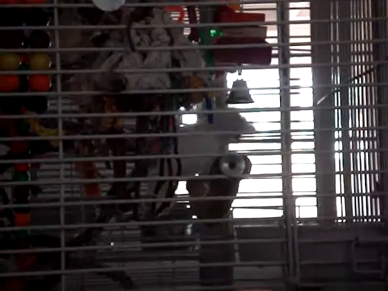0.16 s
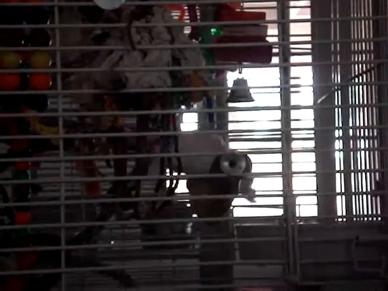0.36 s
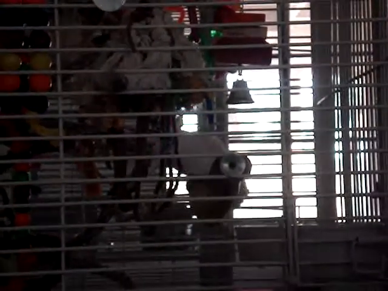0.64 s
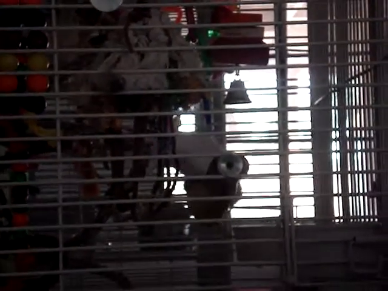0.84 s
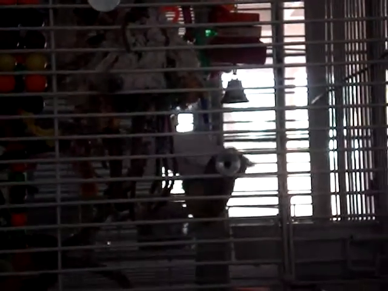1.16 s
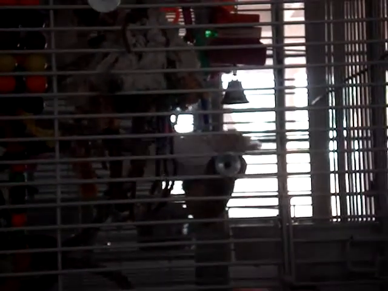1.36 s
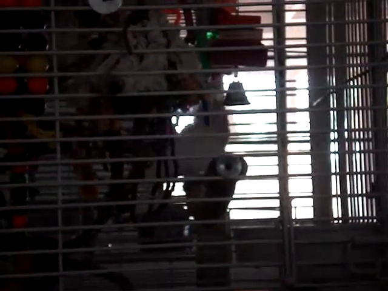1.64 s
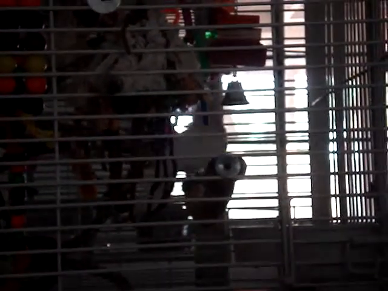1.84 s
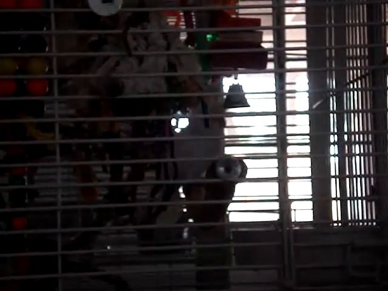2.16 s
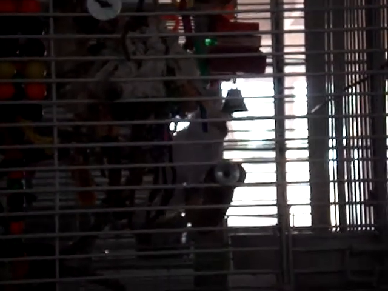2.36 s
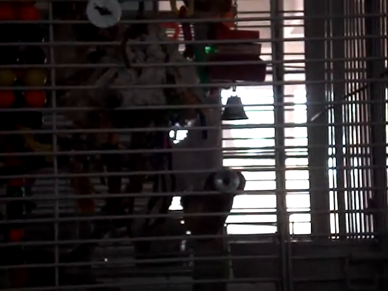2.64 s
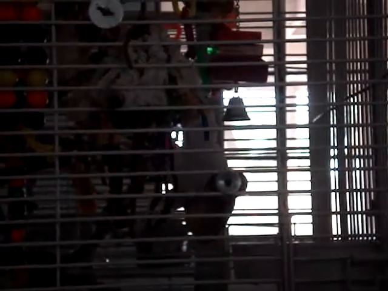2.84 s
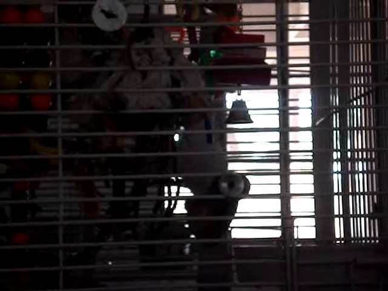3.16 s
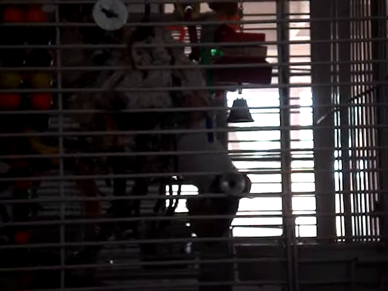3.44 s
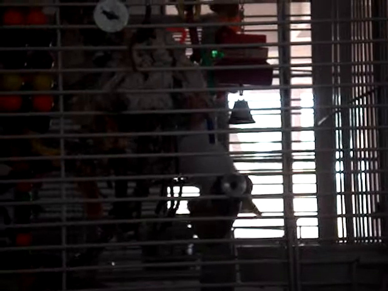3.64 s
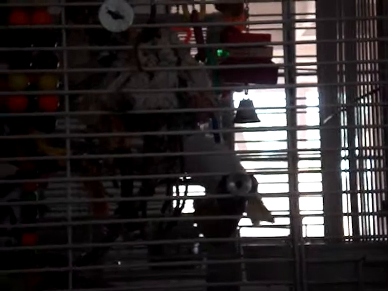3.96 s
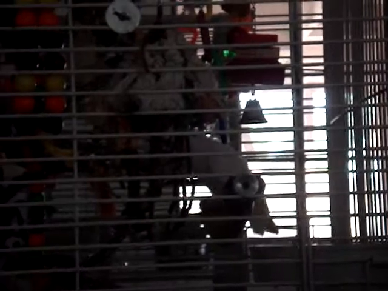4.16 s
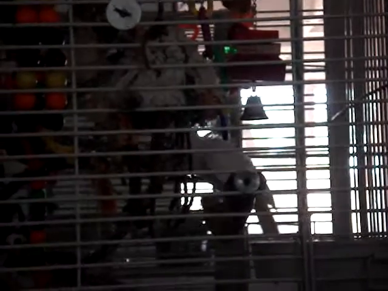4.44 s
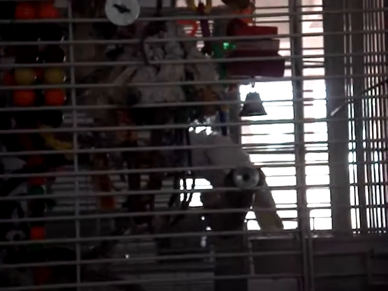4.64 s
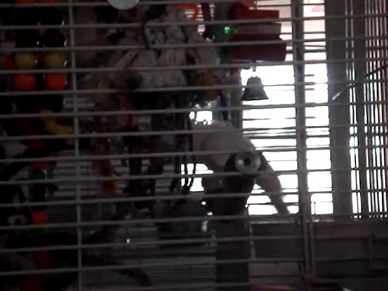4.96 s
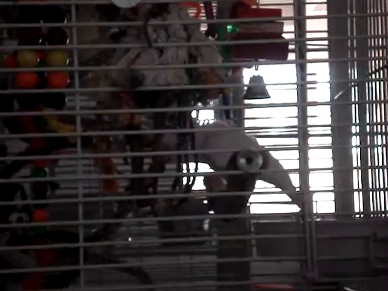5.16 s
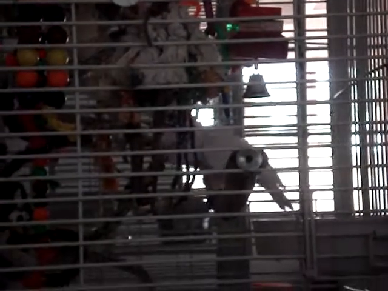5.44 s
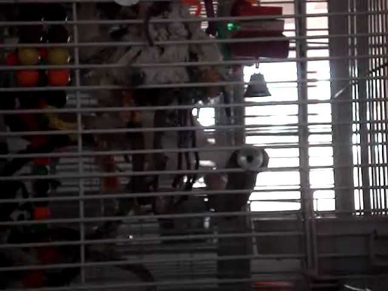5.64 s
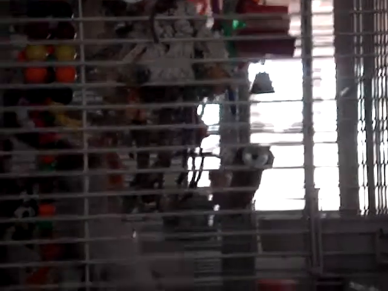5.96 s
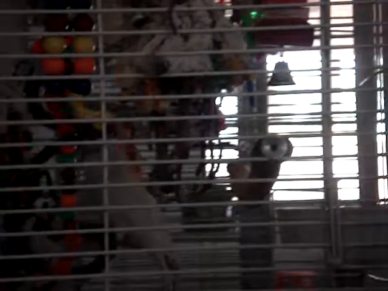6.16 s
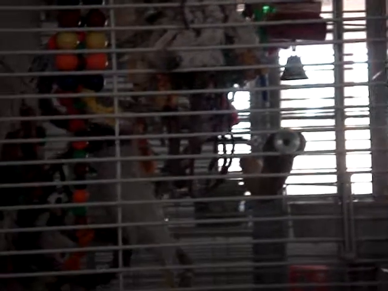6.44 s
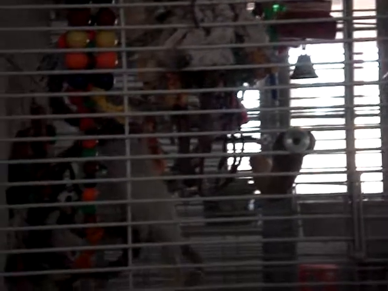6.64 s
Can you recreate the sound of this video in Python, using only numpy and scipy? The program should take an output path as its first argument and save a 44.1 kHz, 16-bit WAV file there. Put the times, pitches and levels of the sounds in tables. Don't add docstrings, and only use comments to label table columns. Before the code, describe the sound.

A caged cockatoo screeches harshly in four spaced bursts in a hard, ringing room, over a low appliance hum, with a late feather rustle and tiny bell tinkle.

```python
import sys
import numpy as np
from scipy import signal
from scipy.fft import rfft, irfft
from scipy.io import wavfile

SR = 44100
rng = np.random.default_rng(int(sys.argv[2]) if len(sys.argv) > 2 else 0)


def boost(x):
    u = np.asarray(x, float) / 20
    return 10 ** u


def log_audio(samples):
    frames = np.atleast_2d(samples).T
    limited = np.clip(frames, -1, 1)
    pcm = np.round(limited * 32767).astype(np.int16)
    wavfile.write(sys.argv[1], SR, pcm)


N = 300310


def evened(x):
    return x / np.sqrt(np.mean(x ** 2) + 1e-20)


def read(points, hz):
    f, value = np.transpose(points)
    return np.interp(np.log(hz + 1), np.log(f + 1), value)


def over(rows, t):
    s, *columns = np.transpose(rows)
    return [np.interp(t, s, column) for column in columns]


def coloured(x, points):
    gain = boost(read(points, np.fft.rfftfreq(len(x), 1 / SR)))
    return evened(irfft(rfft(x) * gain, len(x)))


def wander(n, hz):
    return evened(signal.lfilter(*signal.butter(2, hz, fs=SR), rng.standard_normal(n)))


def resonate(x, hz, width):
    turn = np.exp(2j * np.pi * np.cumsum(hz) / SR)
    r = np.exp(-np.pi * width / SR)
    smooth = signal.lfilter([1], np.convolve([1, -r], [1, -r]), x / turn)
    return evened((turn * smooth).real)


def swell(t, start, rise, hold, fade_db_per_s):
    rise_db = 14
    u, rise = t - start, max(rise, 1e-3)
    climb = -rise_db * np.clip(1 - u / rise, 0, 1)
    fade = fade_db_per_s * np.maximum(u - rise - max(hold, 0), 0)
    return np.where(u < 0, -200., climb - fade)


def strokes(rows, t, fade_db_per_s):
    return sum(boost(db + swell(t, s, rise, hold, fade_db_per_s)) for s, rise, hold, db in rows)


# (time [s], throat [Hz], main [Hz], gape [0-1], pinch [0-1])
TRACT = [(0, 1566, 2510, .3, 0.13), (.12, 1415, 2290, 0.1, 0), (.23, 1845, 2700, 1, 0.2),
         (.4, 1540, 2364, 0.3, 0.29), (.46, 1500, 2374, 0, 0.11), (.56, 1480, 2430, 0, 0.05),
         (.6, 1700, 2664, 0.74, 0.01), (.76, 1574, 2733, 0.8, 0.25),
         (0.812, 1610, 2884, 0.26, 0.81), (.99, 1374, 2788, 0.022, 0.7), (1.221, 1850, 2804, 0.74, 0.49),
          (1.442, 1530, 2690, 0.25, 0.49),
         (2.16, 1380, 2240, 0.19, 0.09), (2.311, 1410, 2384, 0.12, 0.055),
          (2.37, 1594, 2540, 0.95, 0.0072), (2.459, 1585, 2500, 0.49, 0.055),
          (2.492, 1740, 2994, 0.036, .9), (2.549, 1745, 3020, .25, 0.44), (2.591, 1910, 2764, 0.51, 0.062),
          (2.769, 1573, 2393, 1, 0.05), (2.978, 1434, 2315, 0.92, 0.43),
         (3.83, 1190, 2380, 0.85, 0.013), (3.885, 1280, 2378, 0.42, 0.031), (3.905, 1350, 2420, 0.43, 0.78),
         (3.939, 1400, 2515, 0.18, 0.61), (3.958, 1525, 2500, 0.98, .02), (4.042, 1594, 2390, 0.82, .02),
         (4.14, 1740, 2885, 0.39, .15),
         (4.171, 1770, 2840, 0.65, .9), (4.22, 1760, 2862, 0.47, 0.55), (4.27, 1715, 2607, 0.42, 0.18),
        (4.339, 1630, 2500, 0.31, 0.47), (4.418, 1675, 2664, 0.92, 0.33), (4.549, 1624, 2555, 0.93, 0.2),
        (4.769, 1640, 2415, 0.64, 0.22), (4.979, 1527, 2370, 0.41, 0.35),
         (6.482, 1280, 2392, 0.11, .3), (6.578, 1374, 2474, 0.077, 0.25), (6.66, 1490, 2501, 0.12, 0.22),
        (6.718, 1505, 2553, .15, 0.45), (6.81, 1460, 2405, 0.22, 0.28)]
SHUT_HZ = [3500, 5200, 8000]
OPEN_HZ = [4150, 6400, 9250]


def vocal_tract(start, rise, hold, effort_db, bright_db, ring_db, hiss_db, top_db, tongue):
    fade_db_per_s, dulling, treble_lead = 151.5, 0.77, .25
    throat_db, pinched_db, whistle_share = 3.0, -23.5, .7
    beak_db, beak_follows, rasp_db, rasp_follows = -1.53, 0.44, 14, 1
    t = start + np.arange(0, .7, 1 / SR)
    shape = swell(t, start, rise, hold, fade_db_per_s)
    throat, main, gape, pinch = over(TRACT, t)

    high = bright_db + np.where(t > start + rise, dulling, -treble_lead) * shape
    low = throat_db + pinched_db * pinch
    mid = ring_db + beak_db + beak_follows * high
    rasp = hiss_db + rasp_db + rasp_follows * high + .5 * pinched_db * pinch
    levels = effort_db + shape, low, mid, high, rasp

    lifts = (0, tongue, tongue)
    beak, upper, top = (shut + (wide - shut) * (gape + lift)
                        for shut, wide, lift in zip(SHUT_HZ, OPEN_HZ, lifts))
    whistling = np.clip(whistle_share * pinch, 0, .9)
    return t, levels, (throat, main, beak, upper, top), top_db - 17, whistling


# (start [s], rise [s], hold [s], effort [dB], brightness [dB])
SYLLABLES = [(0, 0.0013, 0.025, -26, -14), (.1, 0.076, 0.055, -36.5, -12),
             (0.211, 0.089, 0.032, -22, -10.5), (0.415, 0.015, 0.044, -19, -11.5),
             (0.574, 0.0064, 0.13, -20, -9), (.775, 0.013, 0.3, -18, -7.5), (1.058, 0.022, 0.28, -20, -6),
             (2.176, 0.049, 0.036, -28, -11), (2.343, 0.027, 0.046, -22, -9),
             (2.437, 0.0091, 0.028, -33.5, -20), (2.486, .021, 0.047, -18, -11),
             (2.55, 0.007, 0.17, -23, -3.5), (2.738, 0.048, 0.026, -24, -4.5),
             (2.87, 0.026, 0.059, -33, -16), (3.838, 0.023, 0.014, -36, -13),
             (3.891, 0.0063, 0.023, -24.5, -44), (3.947, 0.047, 0.075, -21, -9),
             (4.159, 0.017, 0.11, -17.5, -7), (4.32, 0.013, 0.16, -19.5, -8), (4.5, 0.023, 0.24, -21, -5.5),
             (4.817, 0.014, 0.061, -25.5, -11.5), (6.494, 0.044, .021, -24.5, -21),
             (6.552, 0.02, 0.095, -18.5, -14), (6.732, .03, 0.054, -19, -13.5)]
CLARITY = [0, .4, .25, .15, .2, .3, .15, .15, 0, .9, 0, .2, .15, .7, .4, .9, .5, .1, 0, 0, .3, .5, .5, .35]
# (beak ring [dB], rasp [dB], top resonance [dB], tongue lift [0-1])
COLOUR = [(2.3, 2.5, 2.5, .05), (4.5, -3, 3, .05), (-1.3, 4.2, -0.5, 0.3), (2.5, -4.8, 3, 0.06),
          (2.7, 2.5, -0.5, .15), (1, 1.4, -1.7, 0), (2.5, 2.9, 0, 0), (3.5, 5, -9, .05), (3, 2.3, -1, .15),
          (17, -1, 1, .15), (6, 5.5, -7, 0.3), (-1.5, 0.5, -0.5, 0.26), (-0.5, 2.2, 2, .05),
          (-14, -4.5, -1, 0), (-0.5, 4.5, -2, 0), (-5, -8, 0, .05), (-5.5, 4.3, -2.5, 0.1),
          (0.4, 5.5, -2.5, .25), (-2, -3, -8, 0.2), (2, 1.2, -0.3, 0), (-4.5, 0.5, 2, .05), (5.5, 1, 3, .3),
          (3.5, 5, 2.5, .3), (7, 4.5, 0, 0.59)]
WIDTHS = [370, 513, 437, 496, 695]
# (frequency [Hz], density [dB per Hz])
RASP = [(290, -70.5), (500, -3.5), (1140, -25), (1540, 1.5), (2330, 8), (2840, 3), (3340, 5), (6400, -5),
        (9910, -33), (12900, -53), (21800, -120)]


def squawk(row, clarity, colour):
    t, levels, resonances, top_db, lock = vocal_tract(*row, *colour)
    effort, low, mid, high, rasp = levels
    n = len(t)
    narrowing, steady_whistle = .55, .35
    widths = np.multiply(WIDTHS, 1 - narrowing * clarity)
    lock = lock + (1 - lock) * steady_whistle * clarity

    shake = 0.0843 * (1 - clarity) * (1 - lock)
    throat, main, beak, upper, top = (hz * (1 + shake * wander(n, 133.5)) for hz in resonances)

    beats_hz, breath = 800, .55
    beats = (rng.random(n) < beats_hz / SR) * boost(2.0 * rng.standard_normal(n))
    drive = evened(beats - beats.mean()) + breath * rng.standard_normal(n)
    drive *= boost(0.43 * np.clip(wander(n, 260), -3, 1.5))

    slip, flutter_db = .015, 4
    phase = 2 * np.pi * np.cumsum(main * (1 + slip * wander(n, 101.0))) / SR
    flutter = boost(flutter_db * np.clip(wander(n, 150), -3, 1.2))
    whistle = flutter * (np.sin(phase) + 0.017 * np.sin(2 * phase))

    voice = np.sqrt(1 - lock) * resonate(drive, main, widths[1]) + np.sqrt(lock) * evened(whistle)
    voice -= boost(low) * resonate(drive, throat, widths[0])
    voice -= boost(mid - 2.0) * resonate(drive, beak, widths[2])
    voice += boost(high - 8.0) * resonate(drive, upper, WIDTHS[3])
    voice -= boost(high + top_db) * resonate(drive, top, WIDTHS[4])
    voice += boost(rasp - 9) * coloured(drive, RASP)
    return round(t[0] * SR), boost(effort - 3.5) * voice * signal.windows.tukey(n, 360 / n)


def cockatoo():
    bird = np.zeros(N)
    for start, sound in map(squawk, SYLLABLES, CLARITY, COLOUR):
        bird[start:start + len(sound)] += sound[:N - start]
    return signal.sosfilt(signal.butter(4, 850, "high", fs=SR, output="sos"), bird)


# (frequency [Hz], decay by 60 dB [s])
ROOM = [(700, 1), (1500, 0.42), (1900, 0.66), (2350, 0.5), (2900, 0.56), (5000, 0.49), (9000, 0.34)]


def room(x):
    taps = np.zeros(SR)
    at = np.arange(300, SR - 20, 20)
    taps[at + rng.integers(0, 20, len(at))] = rng.choice([-1., 1.], len(at))
    hz, t, z = signal.stft(taps, SR, nperseg=256)
    decay = boost(-60 * t / read(ROOM, hz)[:, None])
    tail = signal.istft(z * decay, SR, nperseg=256)[1]
    return signal.fftconvolve(x, tail / np.linalg.norm(tail))[:N]


# (start [s], end [s], drop [dB])
DUCK = [
    (.6, 1.404, -19.5),
    (2.41, 2.76, -10),
    (4.15, 4.25, -12),
    (4.25, 4.964, -7.5),
    (6.56, 6.81, -7),
]


def gain_db():
    first_db, full_db, recovery_s, step = -56.5, -41, 1.666, .01
    t, level = np.arange(0, N / SR + step, step), [first_db]
    pull = sum(drop / (end - start) * ((t >= start) & (t < end)) for start, end, drop in DUCK)
    for p in pull[:-1]:
        level.append(level[-1] + step * (p + (full_db - level[-1]) / recovery_s))
    return np.interp(np.arange(N) / SR, t, level)


# (frequency [Hz], density [dB per Hz])
HUSH = [(15, -33), (25, -14), (75, -25.5), (124, -12), (176, -18), (226, -8), (276, -13), (492, -3),
        (616, -7.5), (681, -5.5), (771, -6.5), (919, -4), (1120, -11.5), (2210, -13.5), (9910, -45.5),
        (12900, -65.5), (21800, -120)]
# (frequency [Hz], level [dB])
HUM = [(118.4, -64), (226.1, -59), (328.4, -73.5), (376.8, -58.5), (506.0, -56.5), (683.7, -46.5),
       (807.5, -61.5)]
# (frequency [Hz], density [dB per Hz])
FEATHER = [(590, -41), (1000, -15), (1540, 2), (1730, -13), (2510, -4), (5730, -8.5), (9910, -15.5),
           (12900, -57.5), (21800, -120)]


def background():
    t = np.arange(N) / SR
    air = boost(-43.5) * coloured(rng.standard_normal(N), HUSH)
    hum = np.zeros(N)
    for hz, db in HUM:
        level = boost(db - 1.0 + 0.28 * wander(N, 11))
        hum += level * np.sin(2 * np.pi * hz * t + 0.95 * wander(N, 4.2))
    hiss = boost(-59.0) * coloured(rng.standard_normal(N), FEATHER)
    return boost(gain_db() + 50.5) * (air + hum) + hiss


# (time [s], level [dB])
THUMPS = [(.62, -61), (1.13, -53), (1.33, -56), (2.49, -58), (2.56, -54), (4.05, -56), (4.17, -48),
          (4.31, -48.5), (4.78, -59), (6.58, -45)]


def low_thumps():
    t = np.arange(N) / SR
    shape = sum(boost(db) * np.exp(-((t - s - .02) / .022) ** 2) for s, db in THUMPS)
    return shape * evened(signal.lfilter(*signal.butter(1, 45, fs=SR), rng.standard_normal(N)))


# (start [s], rise [s], hold [s], level [dB])
RUSTLE = [
    (5.7, 0.027, 0.066, -56.5),
    (5.85, .006, 0.045, -49),
    (5.9, .05, .04, -44),
    (6.05, 0.011, .012, -49),
    (6.125, 0.0062, 0.019, -61.5),
    (6.335, 0.022, 0.074, -52.5),
]


def rustle():
    grain = rng.standard_normal(N) * boost(.8 * wander(N, 120))
    return strokes(RUSTLE, np.arange(N) / SR, 130) * coloured(grain, FEATHER)


# (start [s], rise [s], hold [s], level [dB])
JINGLE = [
    (5.91, .021, .012, -59),
    (6.05, .012, .11, -53),
    (6.127, .012, .075, -60),
]
# (frequency [Hz], level [dB], free decay by 60 dB [s], not used)
BELL = [(3828, -5, 0.34), (5755, -7, 0.8), (6800, -7.5, 0.67), (8236, -9, 0.9), (8495, -12, 5.0),
        (9555, -9, 5.0)]


def toy_bell():
    chatter = rng.standard_normal(N) * (rng.random(N) < 900 / SR)
    rings = sum(boost(db) * resonate(chatter, np.full(N, hz), 110) for hz, db, t60 in BELL)
    return strokes(JINGLE, np.arange(N) / SR, 400) * rings


def scene():
    bird = cockatoo()
    return (bird + boost(-2.0) * room(bird) + background() + low_thumps() + rustle() + toy_bell())[None]


def roll_off(x):
    return signal.sosfilt(signal.butter(12, 10060, fs=SR, output="sos"), x)


def record(dry):
    rounded = .75 * np.tanh(dry / .75)
    cut = signal.firwin(511, 10000, window=("kaiser", 9), fs=SR)
    return roll_off(signal.oaconvolve(rounded, cut[None], "same"))


dry = scene()
out = record(dry)
log_audio(out)
```